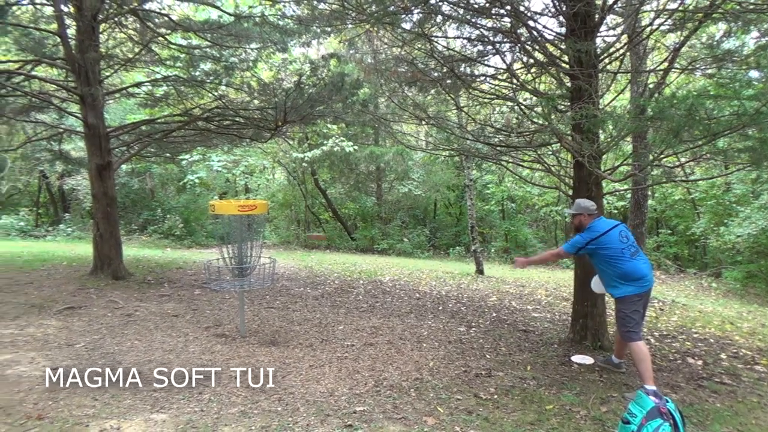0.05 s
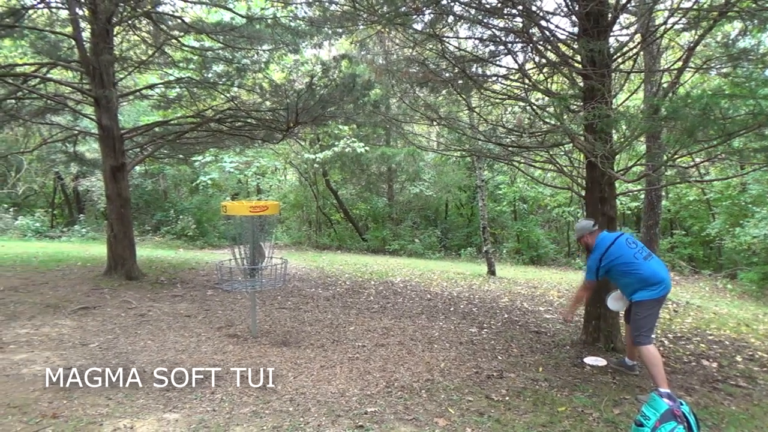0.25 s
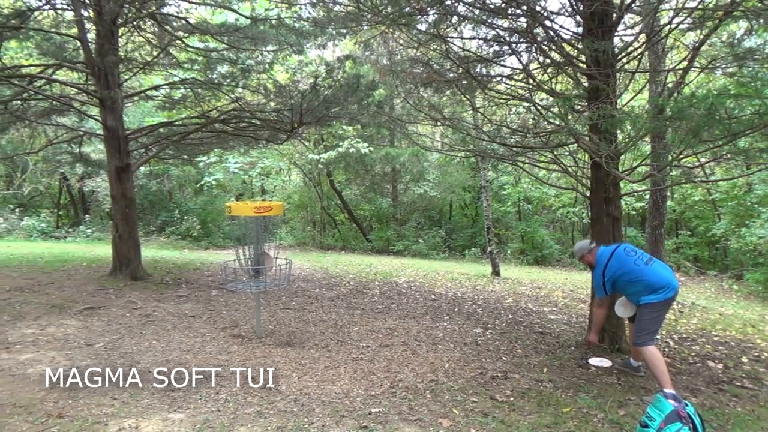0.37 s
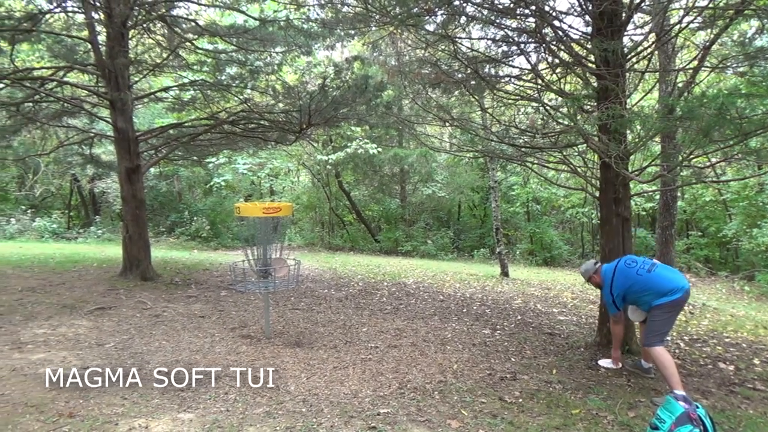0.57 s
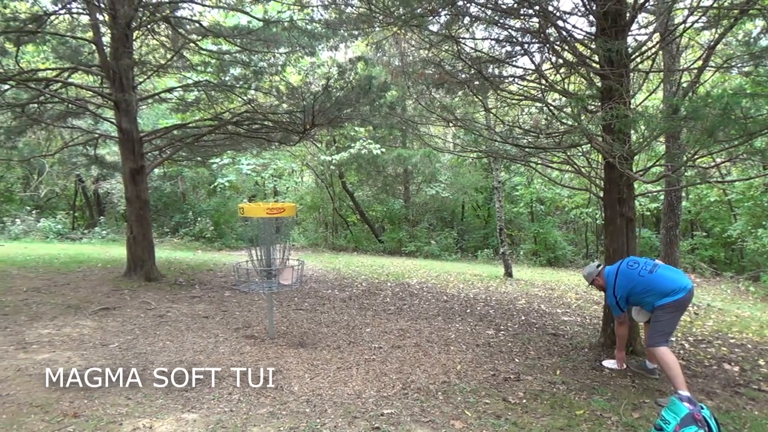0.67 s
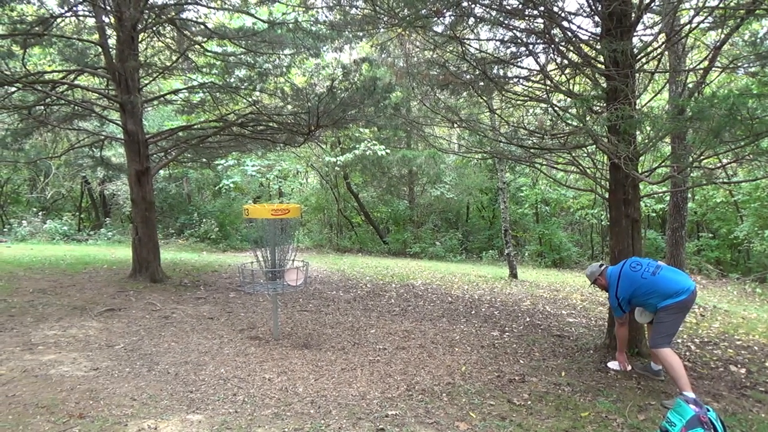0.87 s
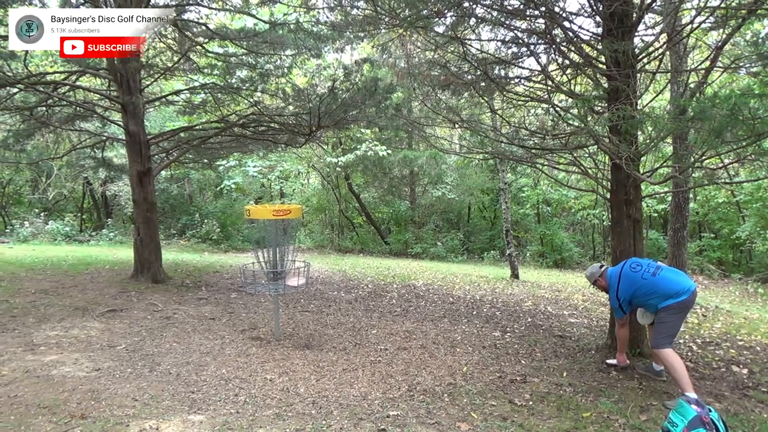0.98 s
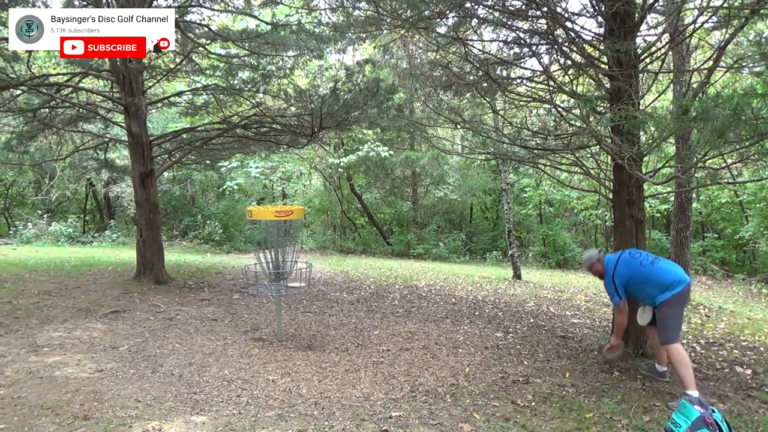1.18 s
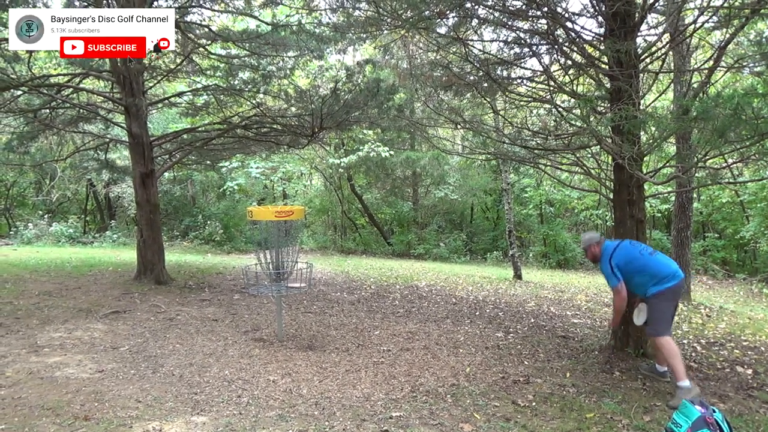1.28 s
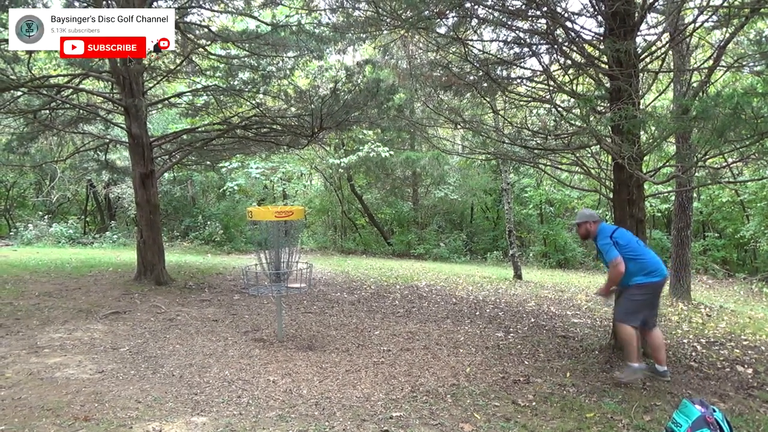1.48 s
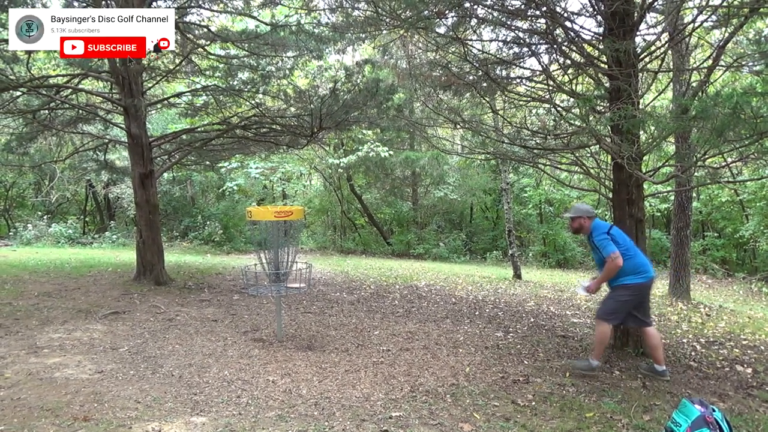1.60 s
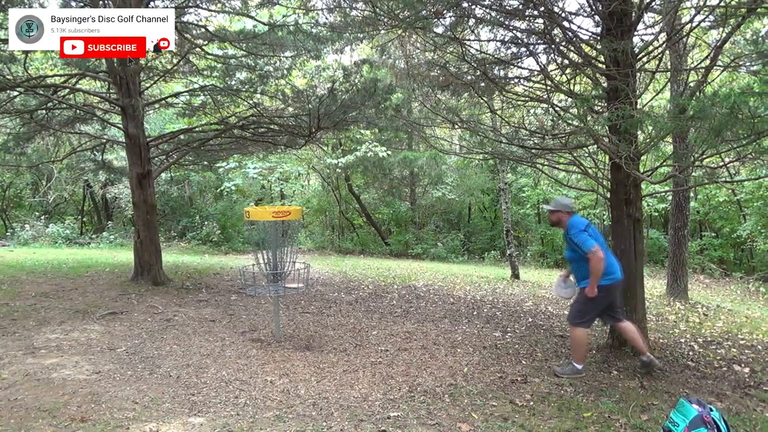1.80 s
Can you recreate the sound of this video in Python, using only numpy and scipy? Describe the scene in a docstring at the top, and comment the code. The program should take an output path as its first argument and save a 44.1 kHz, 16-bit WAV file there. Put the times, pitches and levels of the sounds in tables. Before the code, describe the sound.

A disc crashes into a metal basket's chains, which jingle and slowly settle.

```python
"""First comes a faint hiss of insects in a wood, with feet shuffling on dry leaves. Then a thrown
plastic disc crashes into the hanging steel chains of a basket. The links click and ring as they hit
each other, clash again as they swing back, and squeak as they slide, while the disc knocks down into
the tray. The player clacks two discs together, and twigs pop underfoot."""
import sys
import numpy as np
from scipy import signal
from scipy.fft import rfft, irfft, next_fast_len
from scipy.io import wavfile

SR = 44100
rng = np.random.default_rng(int(sys.argv[2]) if len(sys.argv) > 2 else 0)


def dump(signal):
    """Clip the signal to [-1, 1] and save it as 16-bit WAV at the path in sys.argv[1]."""
    limited = np.clip(np.atleast_2d(signal).T, -1, 1)
    pcm = np.round(limited * 32767).astype(np.int16)
    wavfile.write(sys.argv[1], SR, pcm)


N = 81585

# tone of the still air (frequency [Hz], level [dB])
AIR_TONE = [(20, -20), (45, -24), (75, 3.5), (150, 4), (400, -26), (700, -3), (2000, -41), (5000, -14),
            (12000, -49)]
# tone of the insect hiss (frequency [Hz], level [dB])
INSECT_TONE = [(5000, -33), (5850, -23), (6400, -0.5), (6850, 3), (7350, -0.5), (7900, -26.5), (15000, -30)]
# tone of the dry leaves (frequency [Hz], level [dB])
LEAF_TONE = [(40, -6), (120, -4.5), (300, 2.5), (520, -2), (1200, -6), (2200, -3), (4000, -14),
             (10000, -16.5)]
# how loudly the feet shuffle (time [s], level [dB])
SHUFFLE_LEVELS = [(.15, -70), (.45, -62.5), (1.1, -57), (1.25, -60.5), (1.5, -59), (1.85, -60)]
# how much the background differs between the ears (frequency [Hz], level [dB])
STEREO_WIDTH = [(30, -4), (150, -8), (1500, -28), (7000, -8)]
# loudness of the rattling chains (time [s], high ring [dB], low ring [dB], click [dB])
RATTLE_LEVELS = [(0.233, -44, -37, -28), (.275, -27.5, -31, -31.5), (0.318, -18.5, -26.5, -34),
                 (0.396, -22, -32, -35.5), (0.444, -32.5, -43, -38.5), (.62, -40, -55, -43.5)]
# chains swinging together (time [s], high ring [dB], low ring [dB], click [dB], length [s])
CHAIN_CLASHES = [(0.237, -23, -55, -53, 0.0064), (0.248, -20, -54.5, -31, .005),
                 (.301, -17.5, -23.5, -30.5, 0.013), (.326, -30, -26, -28.5, 0.0076),
                 (.349, -24, -23, -43, .016), (.378, -25, -30.5, -35.5, .006),
                 (0.413, -38, -59, -34.5, 0.0039), (0.484, -27, -65, -50, .012),
                 (.545, -32, -46, -61, 0.013), (0.561, -56, -77.5, -41, 0.0119),
                 (.591, -30, -39.5, -50, 0.0021), (0.669, -33, -77, -48, 0.017),
                 (.701, -22.5, -41, -49, .012), (.713, -26.5, -46, -42.5, 0.01572),
                 (.761, -42, -36.5, -42, 0.0078), (0.834, -26.5, -48, -52, .02),
                 (.852, -32.5, -46, -51.5, 0.0242), (0.948, -33, -70, -62, .01),
                 (0.97, -31, -70, -50, 0.011), (1.009, -32, -47, -54, 0.0132), (1.026, -57, -41, -47, 0.03),
                 (1.056, -41, -65, -75, 0.011), (1.101, -39.5, -73, -52, 0.012),
                 (1.128, -39.5, -75, -62, .018), (1.193, -49, -58.5, -73, .005),
                 (1.214, -72, -41, -51, 0.001915), (1.266, -40, -55, -54, 0.0044),
                 (1.284, -58, -55, -46, 0.019), (1.319, -38.5, -75, -57.5, 0.0028),
                 (1.333, -36.5, -49.5, -52, 0.015), (1.378, -39.5, -43, -43.5, .005),
                 (1.4224, -37, -75, -60, .003), (1.548, -45.5, -54.5, -54.5, .002),
                 (1.648, -41.5, -96.5, -99, .003), (1.701, -43.5, -65, -52.5, 0.008)]
# A ring time, or T60, is how long a sound takes to fade by 60 dB.
# a link's low notes (pitch [Hz], level [dB], ring time [s], spread between links [Hz])
LINK_LOW_NOTES = [(4472, -1.5, 0.15, 8.3), (4530, -6.5, 0.47, 2.76), (4606, -7, 0.25, 8.8),
                  (4730, -1.5, 0.076, 21)]
# a link's high notes (pitch [Hz], level [dB], ring time [s], spread between links [Hz])
LINK_HIGH_NOTES = [(11690, -5, 0.05, 50), (11890, 0, 0.1, 68), (12170, 2, 0.19, 35.4),
                   (12130, 2, 0.034, 180), (12560, -3, 0.15, 69), (12840, -1.5, 0.11, 72),
                   (14180, -9, 0.095, 160)]
# tone of link clicking on link (frequency [Hz], level [dB])
CLICK_TONE = [(100, -68), (450, -12.5), (1800, -3.5), (3700, -10), (5200, 2), (7500, -3.5), (13500, 4),
              (15800, -12)]
# notes of the wire tray and pole (pitch [Hz], level [dB], ring time [s])
TRAY_NOTES = [(350, -49.5, 0.12), (1553, -35, 0.13), (1674, -34.5, 0.14)]
# the disc knocking in the basket (time [s], body [dB], crack [dB])
BASKET_KNOCKS = [(.2325, -25.5, -24), (.314, -35, -53), (.378, -38.5, -59), (.474, -45, -37.5),
                 (.557, -39, -65), (.765, -37.5, -64), (.788, -40.5, -65), (.833, -46, -65),
                 (.857, -38, -42), (1.081, -45, -42.5)]
# notes of the disc's body (pitch [Hz], level [dB], ring time [s])
DISC_NOTES = [(668, -8.5, 0.032), (757, -3.5, 0.026), (872, -7, 0.027), (1147, -19.5, 0.038),
              (1568, -12, 0.04), (2455, -10, 0.012), (3020, -16.5, 0.022)]
# tone of a sharp crack, for discs and twigs (frequency [Hz], level [dB])
CRACK_TONE = [(60, -18), (350, -27), (900, 3.5), (2800, 10.5), (4800, 2.5), (11000, 0), (15000, -6)]
# links sliding on each other (time [s], level [dB], pitch [Hz])
LINK_SQUEAKS = [(.695, -46, 7030), (0.774, -47, 6400), (1.127, -50.5, 3266), (1.171, -54, 3260)]
# discs clacking in the player's hands (time [s], body [dB], crack [dB])
HAND_CLACKS = [(1.4022, -38, -18), (1.408, -33, -45), (1.4156, -16.5, -19), (1.579, -41, -51)]
# twigs popping underfoot (time [s], level [dB], pitch [Hz])
TWIG_POPS = [(1.766, -47, 1620), (1.7988, -35, 878), (1.814, -43, 1480), (1.8425, -37, 1450)]

HIT_S = .2315  # the disc first touches the chains
SETTLE_DB_PER_S = [21, 16, 26]  # how fast the high ring, low ring and clicks die away
RING_RISE_S = 0.00042
TOP_HZ = 15850


def amp(db):
    """Turn decibels into a volume multiplier."""
    return 10 ** (np.asarray(db) / 20)


def unit(x):
    """Scale to an average power of 1."""
    return x / np.sqrt(np.mean(x ** 2) + 1e-20)


def unit_energy(x):
    """Scale each row to a total energy of 1."""
    return x / np.linalg.norm(x, axis=-1, keepdims=True)


def fade(t, t60):
    """Die away by 60 dB every t60 seconds."""
    return np.exp(-np.log(1000) * t / t60)


def colour(x, points):
    """Shape a sound's tone along a curve of (frequency [Hz], level [dB]) points."""
    size = next_fast_len(x.shape[-1] + 4096)
    hz, db = np.transpose(points)
    gain = amp(np.interp(np.log(np.fft.rfftfreq(size, 1 / SR) + 1), np.log(hz + 1), db))
    return irfft(rfft(x, size) * gain, size)[..., :x.shape[-1]]


def noise(points, size=N):
    """Noise with the given tone and an average power of 1."""
    return unit(colour(rng.standard_normal(size), points))


def wide_noise(points):
    """Stereo noise, widest in the bass."""
    mid, side = noise(points), colour(noise(points), STEREO_WIDTH)
    return np.array([mid + side, mid - side])


def add(track, s, sound):
    """Mix a sound in at s seconds."""
    part = track[int(s * SR):][:len(sound)]
    part += sound[:len(part)]


def pan(x, db):
    """Place a sound to the left (+) or right (-)."""
    return x * amp([[db], [-db]])


def background(air_db=-68, insects_db=-58.5):
    """Still air, a steady hiss of insects and feet shuffling on dry leaves."""
    air = amp(air_db) * wide_noise(AIR_TONE)
    insects = amp(insects_db) * wide_noise(INSECT_TONE)
    shuffle_db = np.interp(np.arange(N) / SR, *np.transpose(SHUFFLE_LEVELS))
    return air + insects + amp(shuffle_db) * wide_noise(LEAF_TONE)


def link_contacts(count=1100, start_per_s=2200, scatter_db=4.5, links_per_clash=4):
    """When links hit, which link it is, and how hard (high ring, low ring, click)."""
    # the rattle: contacts thin out as the chains settle
    s, *levels = np.transpose(RATTLE_LEVELS)
    remaining = 1 - (np.arange(count) + rng.random(count)) / (count + 1)
    times = HIT_S - np.log(remaining) * count / start_per_s
    settling_s = np.maximum(times - s[-1], 0)
    db = [np.interp(times, s, level) - fall * settling_s for level, fall in zip(levels, SETTLE_DB_PER_S)]
    scatter = unit(amp(scatter_db * rng.standard_normal(count)))
    gap_samples = SR / (start_per_s * remaining)
    all_times, links, strengths = [times], [np.arange(count)], [amp(db) * scatter * np.sqrt(gap_samples)]
    # each clash: seven quick contacts among a few links
    order = np.arange(7)
    clash_gain = np.sqrt(0.015 * SR)  # the energy of its level held for 15 ms
    for start, high, low, click, length in CHAIN_CLASHES:
        lag = (order + rng.random(len(order)) * (order > 0)) / len(order)
        shares = unit_energy(np.exp(-lag) * amp(2 * rng.standard_normal(len(order))))
        all_times.append(start + length * lag)
        links.append(rng.integers(count) + order % links_per_clash)
        strengths.append(np.outer(amp([high, low, click]), shares) * clash_gain)
    return np.concatenate(all_times), np.concatenate(links), np.hstack(strengths)


def link_pings(times, strengths, count=3, favoured_share=0.24):
    """Each contact wakes a few of a link's many weak notes; one answers more often than the rest."""
    t, out = np.arange(SR // 20) / SR, np.zeros(N + SR)
    shape = np.sqrt(2 / count) * unit_energy(fade(t, t60=.055) * (1 - np.exp(-t / RING_RISE_S)))
    for s, strength in zip(times, strengths):
        favoured = rng.random(count) < favoured_share
        hz = np.where(favoured, rng.normal(8944, 122, count), rng.uniform(2625, 11447, count))
        add(out, s, strength * shape * np.sin(2 * np.pi * np.outer(hz, t)).sum(0))
    return colour(out[:N], CLICK_TONE)


def link_ring(notes, t):
    """One steel link rings, tuned a little differently from its neighbours."""
    ring = np.zeros(len(t))
    for hz, db, t60, spread in notes:
        loudness = amp(db + 1.8 * rng.normal()) * fade(t, t60)
        own_hz = hz + spread * rng.normal()
        ring += loudness * np.sin(2 * np.pi * (own_hz * t + rng.random()))
    return unit_energy(ring * (1 - np.exp(-t / RING_RISE_S)))


def chains(link_count=17, ping_db=-.5, click_db=-2):
    """Every contact makes one of the links ping, click and ring."""
    times, links, strengths = link_contacts()
    t = np.arange(SR // 2) / SR
    out = amp(ping_db) * link_pings(times, strengths[-1])
    for link in range(link_count):
        own = links % link_count == link
        starts = (times[own] * SR).astype(int)
        blows = np.array([np.bincount(starts, row[own], N)[:N] for row in strengths])
        click = amp(click_db) * unit_energy(noise(CLICK_TONE, len(t)) * fade(t, t60=0.024))
        voice = np.array([link_ring(LINK_HIGH_NOTES, t), link_ring(LINK_LOW_NOTES, t), click])
        out += signal.fftconvolve(blows, voice, axes=1).sum(0)[:N]  # play the voice at every blow
    return out


def tray():
    """The wire tray and pole ring once from the hit."""
    t = np.maximum(np.arange(N) / SR - HIT_S, 0)
    return sum(amp(db) * fade(t, t60) * np.sin(2 * np.pi * hz * t) for hz, db, t60 in TRAY_NOTES)


def disc_knocks(knocks, pitch_spread=0.036, rim_db=-22.5, bass_cut_hz=647, crack_hz=6950):
    """Struck plastic gives a sharp crack, a short hollow note and a faint after-ring of the rim."""
    out, t = np.zeros(N), np.arange(SR // 10) / SR
    rim = amp(rim_db) * fade(t, t60=0.069)
    rise = 1 - np.exp(-t / .0003)
    bass_cut = signal.butter(4, bass_cut_hz, "high", fs=SR, output="sos")  # small discs give little bass
    for s, body_db, crack_db in knocks:
        body = np.zeros(len(t))
        for hz, db, t60 in DISC_NOTES:
            loudness = amp(db + rng.normal()) * (fade(t, t60) + rim)
            own_hz = hz * (1 + pitch_spread * rng.normal())  # shifts with the spot that is hit
            body += loudness * np.sin(2 * np.pi * own_hz * t)
        body = signal.sosfilt(bass_cut, body)
        top_hz = min(crack_hz * amp(0.97 * (crack_db - body_db)), TOP_HZ)  # harder hits are brighter
        crack = noise(CRACK_TONE, len(t)) * fade(t, t60=0.02)
        crack = signal.sosfilt(signal.butter(2, top_hz, fs=SR, output="sos"), crack)
        add(out, s, (amp(body_db - 3) * body + amp(crack_db - 3) * crack) * rise)
    return out


def tree_echo(x, mid_db=-21, side_db=-30.5):
    """Sound bounces faintly back from trunks and branches."""
    t = np.arange(SR // 2) / SR
    shape = fade(t, t60=0.13) * (1 - np.exp(-t / 0.0043))
    tails = unit_energy(rng.standard_normal((2, len(t))) * shape)
    mid, side = signal.fftconvolve(x[None], tails, axes=1)[:, :N] * amp([[mid_db], [side_db]])
    return np.array([mid + side, mid - side])


def squeaks(half_length_s=0.018, waver_hz=21):
    """Steel sliding on steel makes brief, slightly rough tones."""
    t = np.arange(N) / SR
    waver = np.cumsum(rng.standard_normal(N)) * np.sqrt(2 * np.pi * waver_hz / SR)
    return sum(amp(db) * np.exp(-((t - s) / half_length_s) ** 2) * np.sin(2 * np.pi * hz * t + waver)
               for s, db, hz in LINK_SQUEAKS)


def twigs(snap_db=-13.5):
    """Twigs pop under a step, each a short woody note with a noisy snap."""
    out, t = np.zeros(N), np.arange(SR // 20) / SR
    for s, db, hz in TWIG_POPS:
        snap = amp(snap_db) * noise(CRACK_TONE, len(t))
        add(out, s, amp(db) * fade(t, t60=0.03) * (np.sin(2 * np.pi * hz * t) + snap))
    return out


def scene():
    """The basket a little to the left, the player a little to the right, the wood all round."""
    basket = chains() + squeaks() + tray() + disc_knocks(BASKET_KNOCKS)
    player = disc_knocks(HAND_CLACKS) + twigs()
    return pan(basket, db=0.6086) + pan(player, db=-.5) + tree_echo(basket + player) + background()


def record(dry):
    """Cut away the very highest treble, above TOP_HZ."""
    size = next_fast_len(N + SR // 2)
    kept = np.fft.rfftfreq(size, 1 / SR) < TOP_HZ
    return irfft(rfft(dry, size) * kept, size)[:, :N]


dry = scene()
out = record(dry)
dump(out)
```